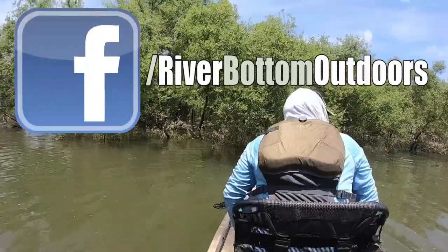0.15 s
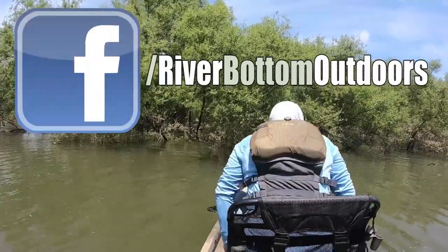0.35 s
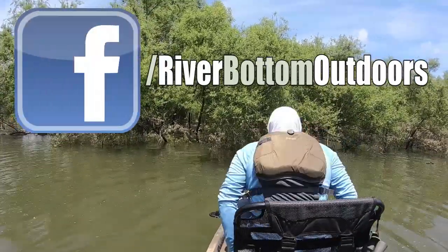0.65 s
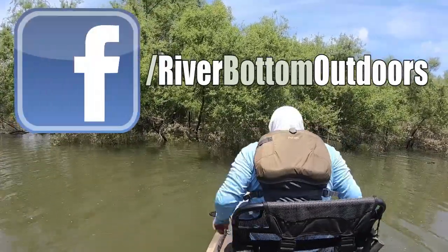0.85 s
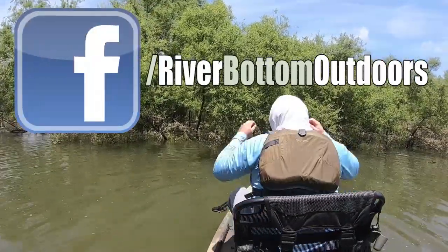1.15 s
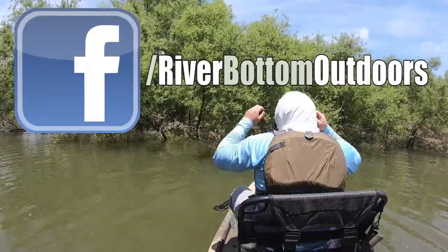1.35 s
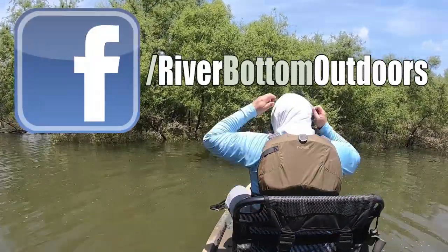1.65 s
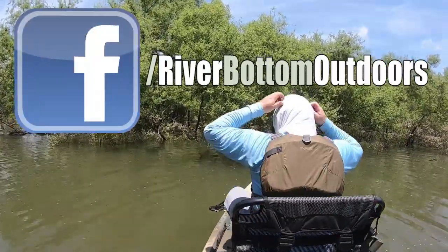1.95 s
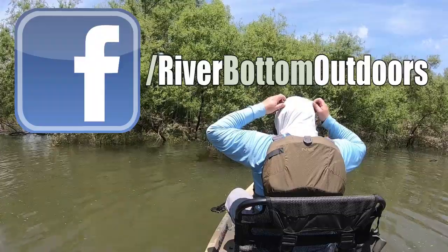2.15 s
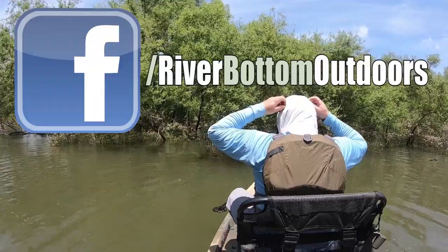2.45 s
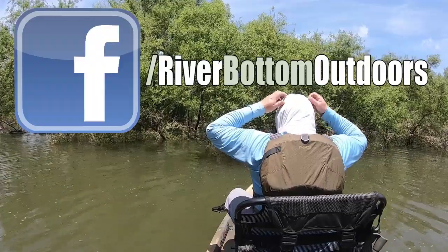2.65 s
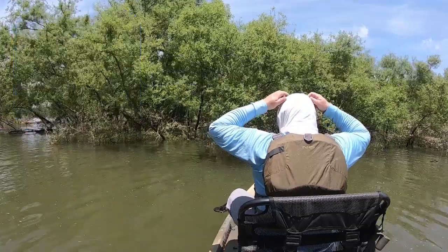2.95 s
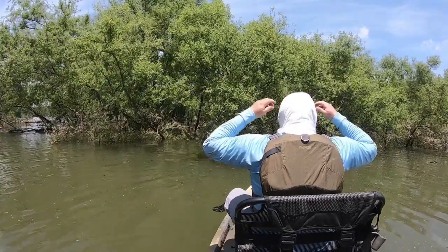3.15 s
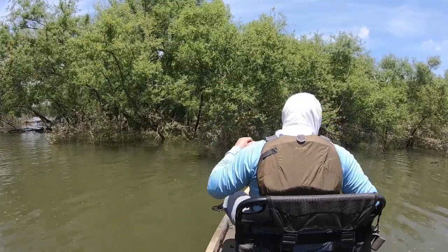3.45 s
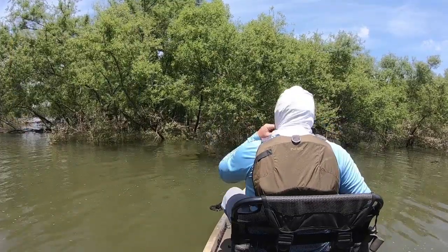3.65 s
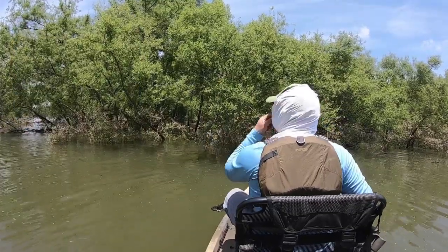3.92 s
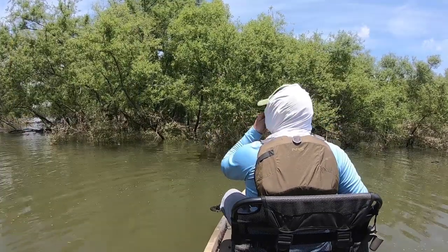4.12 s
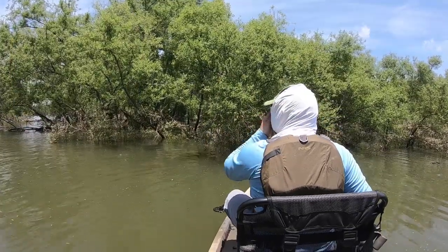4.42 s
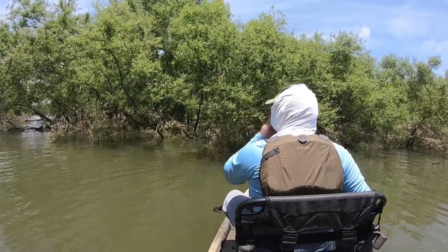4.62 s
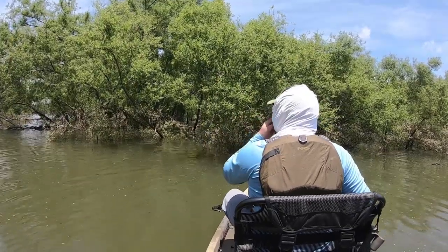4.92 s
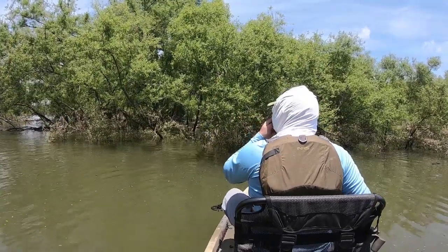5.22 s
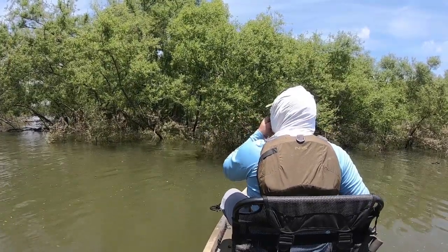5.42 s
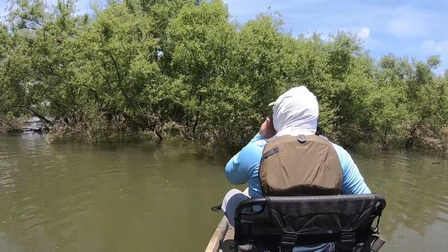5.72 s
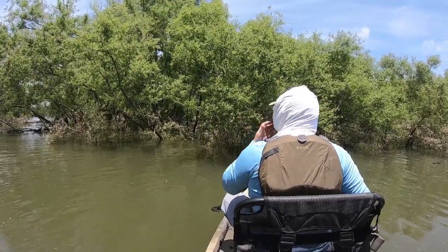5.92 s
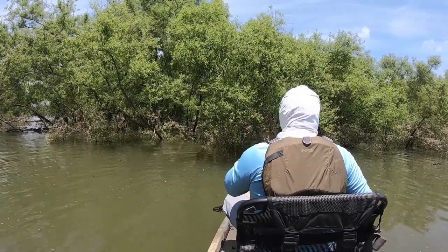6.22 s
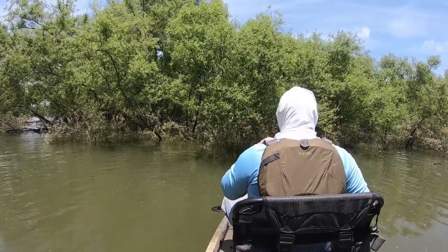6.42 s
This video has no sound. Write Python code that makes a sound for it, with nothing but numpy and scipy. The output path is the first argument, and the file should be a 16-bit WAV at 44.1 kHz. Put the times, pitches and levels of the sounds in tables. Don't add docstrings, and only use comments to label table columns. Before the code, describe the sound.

On a small drifting boat, cloth drags and the hull rumbles at once, then a pole cracks down and bounces with a hollow clatter and small gear ticks, ending in a sharp tap near one second. After that the boat calms; songbirds trill and whistle from waterside trees with soft echoes, while a distant engine idles and another revs up to a steady drone. The microphone is on the boat.

```python
import sys
import numpy as np
from scipy import signal
from scipy.fft import rfft, irfft
from scipy.io import wavfile
from scipy.ndimage import uniform_filter1d, map_coordinates

SR = 44100
rng = np.random.default_rng(int(sys.argv[2]) if len(sys.argv) > 2 else 0)


def gain_from_db(level_db):
    decades = np.asarray(level_db, float) / 20
    return 10 ** decades


def file_out(sig):
    cols = np.atleast_2d(sig).T
    lim = np.clip(cols, -1, 1)
    pcm = np.round(lim * 32767).astype(np.int16)
    wavfile.write(sys.argv[1], SR, pcm)


N = 290001
TIME = np.arange(N) / SR
STRIKE_TIME = np.arange(SR // 3) / SR
STRIKE_HZ = np.fft.rfftfreq(len(STRIKE_TIME), 1 / SR)


def unit(x):
    return x / np.sqrt(np.mean(x ** 2, axis=-1, keepdims=True) + 1e-20)


def along(points, hz):
    f, v = np.transpose(points)
    return np.interp(np.log(hz + 1), np.log(f + 1), v)


def curves(rows):
    s, *cols = np.transpose(rows)
    return [np.interp(TIME, s, c) for c in cols]


def wobble(rate):
    coarse = np.arange(0, N + 16, 16)
    knots = rng.standard_normal(int(N * rate / SR) + 4)
    return np.interp(np.arange(N), coarse, map_coordinates(knots, [coarse * rate / SR]))


def sides(pan_db):
    return gain_from_db([[pan_db / 2], [-pan_db / 2]])


def rush(spectrum, alike, patchy_db):
    _, _, z = signal.stft(rng.standard_normal((2, N + 512)), SR, nperseg=512)
    field = uniform_filter1d(rng.standard_normal(z.shape[1:]), size=6, axis=0)
    field = uniform_filter1d(field, size=10, axis=1)
    pair = signal.istft(z * gain_from_db(patchy_db * field / field.std()), SR, nperseg=512)[1][:, :N]
    size = N + 303
    hz = np.fft.rfftfreq(size, 1 / SR)
    turn = np.arccos(np.clip(along(alike, hz), -1, 1)) / 2
    shaped = rfft(pair, size) * gain_from_db(along(spectrum, hz)) * [np.cos(turn), np.sin(turn)]
    mid, side = irfft(shaped, size)[:, :N]
    return unit(np.array([mid + side, mid - side]))


def add(out, s, sound):
    part = out[:, round(s * SR):][:, :sound.shape[1]]
    part += sound[:, :part.shape[1]]


def echo(x, decay, delay, size):
    hz, t, z = signal.stft(rng.standard_normal((2, size)), SR, nperseg=256)
    tail = signal.istft(z * gain_from_db(-60 * t / along(decay, hz)[:, None]), SR, nperseg=256)[1]
    tail = np.pad(tail / np.linalg.norm(tail[0]), ((0, 0), (round(delay * SR), 0)))
    return signal.fftconvolve(x, tail, axes=1)


# (frequency [Hz], likeness [0-1])
FAR_LIKENESS = [(60, 0.87), (120, 0.95), (260, 0.73), (530, 0.42), (1100, 0.055), (2290, 0.45), (4740, 0.4),
                (9820, 0.031)]
# (frequency [Hz], level [dB per Hz])
HISS_SPECTRUM = [(880, -30), (1500, -15.5), (1790, -3.5), (2090, -2), (2660, 0), (2970, -2.5), (3330, -1),
                 (4980, -9.5), (6920, -10), (10300, -20.5), (13400, -71.5), (22000, -120)]
# (frequency [Hz], level [dB per Hz])
LEAF_SPECTRUM = [(1500, -30), (2200, -5), (3000, 4.5), (4300, -3.5), (5200, -10), (6500, -38)]
# (time [s], level [dB], half length [s])
GUSTS = [
    (0, -67.5, 0.63),
    (0.747, -79, 0.34),
    (4.805, -74, 0.18),
    (6.06, -71.5, 0.56),
]


def air():
    hiss = rush(HISS_SPECTRUM, FAR_LIKENESS, patchy_db=.4)
    breeze = sum(gain_from_db(db) * np.exp(-((TIME - s) / half) ** 2) for s, db, half in GUSTS)
    return gain_from_db(-73.5) * hiss + gain_from_db(4.0) * breeze * rush(LEAF_SPECTRUM, FAR_LIKENESS, patchy_db=4.0)


# (time [s], level [dB])
ROAR_LEVEL = [
    (0, -58),
    (.73, -61.5),
    (1.12, -68.5),
    (2.6, -65.5),
    (6.58, -61),
]
# (frequency [Hz], level [dB per Hz])
ROAR_SPECTRUM = [(35, -44.5), (60, -11), (95, -12.5), (150, -4), (200, -11.5), (330, -16.5), (520, -23.5),
                 (670, -27), (860, -22), (1000, -29.5), (1170, -23.5), (1500, -31), (2400, -38.5),
                 (4500, -120)]


def engine_roar():
    rolling = gain_from_db(.5 * wobble(3)) * rush(ROAR_SPECTRUM, FAR_LIKENESS, patchy_db=1.3)
    return gain_from_db(curves(ROAR_LEVEL)[0] + 11.5) * rolling


# (multiple of firing rate, level [dB rms])
IDLE_TONES = [(1, -61.5), (2, -53.5), (3, -56.5), (4, -60), (5, -64), (6, -68.5), (8, -72.5)]
# (time [s], half length [s], level [dB])
IDLE_SWELL = (3.6, 1.63, 6.2)


def idling_engine():
    firing_hz = 62.88
    turn = 2 * np.pi * np.cumsum(firing_hz * (1 + .002 * wobble(3))) / SR
    s, half, top_db = IDLE_SWELL
    swell_db = top_db * np.exp(-((TIME - s) / half) ** 4)
    return sum(gain_from_db(db + swell_db * (k == 4) + 3.8 * wobble(5)) * np.sin(k * turn) for k, db in IDLE_TONES)


# (time [s], firing rate [Hz], firing level [dB rms])
LAUNCH = [(0, 102.7, -77), (1.0, 102, -61), (1.25, 104.3, -64.5), (1.6, 126.5, -49), (1.94, 138.2, -49),
          (2.45, 143.3, -50.5), (3.2, 143.5, -49), (4, 145.5, -48), (4.8, 146.9, -47.5), (5.6, 146.7, -47),
          (6.58, 148.5, -49)]
# (frequency [Hz], level [dB re firing])
EXHAUST_PIPE = [(205, 2.5), (255, -12), (286, -4.5), (293, -9), (297, -24), (308, -0.5), (380, -15.5),
                (420, -25.5)]
# (multiple of firing rate, level [dB re firing])
UNEVEN_CYLINDERS = [(1 / 3, -21), (2 / 3, -16), (4 / 3, -15), (7 / 3, -21), (4, -30), (5 / 3, -22),
                    (8 / 3, -23)]


def speeding_engine():
    firing_hz, firing_db = curves(LAUNCH)
    turn = 2 * np.pi * np.cumsum(firing_hz * (1 + .0025 * wobble(5))) / SR
    tone = 0
    for k in (1, 2, 3):
        pipe_db = along(EXHAUST_PIPE, k * firing_hz) if k > 1 else 0
        tone = tone + gain_from_db(firing_db + pipe_db + 5.5 + 0.82 * wobble(9)) * np.sin(k * turn)
    for k, db in UNEVEN_CYLINDERS:
        tone = tone + gain_from_db(firing_db + db + 4 * wobble(9.8)) * np.sin(k * turn)
    return tone


def engines():
    tones = idling_engine() + speeding_engine()
    return np.array([tones, np.roll(tones, 2)]) + engine_roar()


def strokes(rows, bend, swell_db):
    notes = []
    for s, length, start_hz, end_hz, db in rows:
        u = np.linspace(0, 1, round(length * SR))
        glide = np.expm1(-bend * u) / np.expm1(-bend)
        notes.append((s, start_hz + (end_hz - start_hz) * glide, db + swell_db * (2 * u - 1) / 2))
    return notes


def arches(rows, back, swell_db, pointed):
    notes = []
    for s, length, foot_hz, top_hz, db in rows:
        u = np.linspace(0, np.pi, round(length * SR))
        below = (1 - np.sin(u) ** pointed) * np.where(u < np.pi / 2, 1, back)
        notes.append((s, top_hz - (top_hz - foot_hz) * below, db - swell_db * (1 - np.sin(u))))
    return notes


# (time [s], peak level [dB])
REPEATS = [
    (3.05, -57),
    (3.276, -54.5),
    (3.515, -52.5),
    (3.745, -51.5),
    (3.989, -52),
    (4.204, -67.5),
]


def repeats(shape):
    when, hz, level = np.transpose(shape)
    t = np.arange(when[0], when[-1], 1 / SR)
    return [(s + when[0], np.interp(t, when, hz), db + np.interp(t, when, level)) for s, db in REPEATS]


# (time [s], length [s], from [Hz], to [Hz], peak level [dB] at its best pitch)
FALLS = [(2.138, 0.1, 3970, 2667, -63.5), (2.662, .113, 5200, 2745, -64.5)]
SWOOPS = [(2.092, 0.035, 3950, 3090, -68), (2.588, 0.022, 4480, 3300, -61.5),
          (3.683, .03, 5600, 4050, -56.5), (3.892, 0.0236, 3250, 2810, -57.5),
          (5.892, .03, 3080, 2716, -60)]
DIVES = [(2.228, 0.041, 2855, 2180, -62), (3.71, .055, 4040, 2900, -57.5), (2.335, .014, 3150, 2500, -62.5),
         (2.772, 0.014, 2850, 2470, -59), (2.842, 0.02, 3750, 3000, -57.5), (2.864, .02, 2870, 2050, -60.5),
         (2.865, 0.043, 3610, 2310, -67), (4.86, 0.036, 3230, 2155, -57), (4.945, 0.021, 2740, 2100, -59),
         (4.838, 0.016, 3430, 3300, -71), (5.662, 0.032, 3150, 2190, -59), (5.872, 0.027, 3380, 3200, -66),
         (5.953, 0.032, 3133, 2550, -62)]
RISES = [(2.2, 0.023, 2320, 2910, -64), (2.296, 0.022, 2116, 3180, -58.5), (2.577, 0.012, 3300, 4500, -62),
         (2.605, 0.018, 3250, 3660, -59), (2.622, 0.03, 3600, 5370, -57.5), (2.645, .01, 5150, 5370, -57),
         (2.797, .042, 2430, 3800, -57), (3.667, 0.016, 3700, 5670, -57), (3.915, 0.075, 2760, 3120, -57),
         (4.565, 0.038, 3180, 3920, -61.5), (4.638, 0.019, 3750, 4580, -56),
         (4.695, 0.016, 4700, 5080, -62), (4.81, 0.024, 2610, 3120, -57.5), (4.83, .01, 3150, 3450, -63),
         (4.898, 0.015, 2170, 2700, -61), (4.955, .02, 2934, 3740, -64), (5.778, 0.013, 2236, 2450, -63),
         (5.81, .016, 2620, 2900, -61.5), (5.845, 0.024, 2940, 3400, -64), (3.785, .012, 3900, 4660, -63),
         (5.925, .03, 2730, 3140, -58.5)]
HOLDS = [(2.72, 0.05, 2760, 2740, -65.5), (2.27, 0.02, 2170, 2130, -66), (2.318, 0.016, 3200, 3150, -63.5),
         (3.64, 0.028, 3750, 3700, -64), (4.605, 0.035, 3900, 3870, -63), (4.657, .033, 4710, 4630, -62),
         (4.79, .018, 2500, 2490, -69), (4.91, 0.032, 2807, 2930, -56.5)]


def main_song():
    song = strokes(FALLS, bend=8.5, swell_db=-17.5)
    song += strokes(SWOOPS, bend=1.5, swell_db=-2.0)
    song += strokes(DIVES, bend=-1.2, swell_db=3.5)
    song += strokes(RISES, bend=0.45, swell_db=3)
    song += strokes(HOLDS, bend=-0.23, swell_db=-6.0)
    best_hz, above_db, below_db = 3300, 18, 5.5
    notes = []
    for s, hz, db in song:
        octave = np.log2(hz / best_hz)
        notes.append((s, hz, db - np.where(octave > 0, above_db, -below_db) * octave))
    return notes


# (time [s], length [s], from [Hz], to [Hz], peak level [dB])
PIPER = [(0, 0.039, 2794, 2697, -51), (1.197, 0.072, 4040, 4050, -67.5), (4.35, 0.085, 2790, 2800, -72.5),
         (4.118, .05, 2810, 2720, -64), (4.29, .05, 2770, 2710, -71), (4.52, 0.055, 2790, 2780, -75),
         (5.14, .02, 2480, 2520, -66), (1.135, .025, 2680, 2600, -72.5), (4.425, .067, 2800, 3300, -64.5),
         (4.67, 0.082, 3300, 2850, -63.5), (5.012, 0.065, 2877, 2700, -64.5),
         (5.648, 0.15, 3200, 3180, -67.5)]
CHIPS = [
    (6.133, 0.0306, 3760, 3420, -56),
    (6.243, 0.0324, 3920, 3420, -58),
]
VEILED = [
    (1.472, 0.023, 5500, 5000, -84.5),
    (1.49, 0.084, 4810, 3090, -73.5),
    (1.6, .035, 4400, 5240, -79.5),
]
LISPS = [(2.885, .075, 7000, 6840, -80.5), (3.36, 0.033, 6980, 7000, -76), (3.71, 0.027, 6920, 7100, -72),
         (4.225, 0.014, 7230, 7010, -70.5), (5.14, .06, 7300, 7054, -80)]
DISTANT = [(1.075, .03, 4300, 3400, -81.5), (1.3, 0.11, 3200, 2400, -81), (1.197, 0.065, 3900, 3900, -79),
           (3.76, .125, 3800, 3590, -70.5), (3.775, .1, 3400, 3700, -76), (5.597, 0.08, 3400, 3620, -78),
           (5.75, .2, 3400, 4000, -87), (5.51, .03, 5000, 4300, -83), (3.79, .05, 4650, 4600, -85),
           (5.53, 0.11, 3900, 4200, -84), (.05, .08, 2760, 2740, -69.5), (6.1, .14, 2750, 2750, -80),
           (3.93, 0.035, 3400, 3250, -74), (6, .12, 4200, 3700, -87)]
# (time [s], length [s], foot [Hz], top [Hz], peak level [dB])
HOOPS = [(5.28, 0.033, 2900, 3700, -57.5), (5.412, .03, 3100, 3670, -57.5),
         (5.302, .024, 3200, 3700, -67.5), (5.433, .024, 3200, 3720, -64.5)]
COOS = [(2.595, 0.155, 450, 650, -51), (5.655, 0.125, 300, 430, -49), (5.27, .11, 280, 375, -57.5)]
# (time from call start [s], pitch [Hz], level [dB])
WHISTLE = [(0, 2720, -12), (0.014, 2783, -3), (.068, 2790, -3), (.08, 2700, -3.5), (.095, 2424, -20)]
SLUR = [(.085, 2511, -22), (.102, 2342, -17.5), (.122, 2623, -12.5), (0.153, 2670, -14)]
# (delay [s], level [dB])
TRUNK_SLAPS = [
    (.092, -8.5),
    (.168, -13),
]


def flock():
    whistle = repeats(WHISTLE)
    slaps = [(s + late, hz, db + loss_db) for late, loss_db in TRUNK_SLAPS for s, hz, db in whistle]
    return [
        (6.5, -2, .3, main_song()),
        (0.5, -12.5, 0.11, strokes(PIPER, bend=-2.4, swell_db=-7.0)),
        (0.0, -16.0, .02, strokes(CHIPS, bend=1.3, swell_db=6)),
        (1.5, 7.5, 1.3, strokes(VEILED, bend=-3.1, swell_db=11.5)),
        (-4.0, -4.5, 0.75, strokes(LISPS, bend=.3, swell_db=-1.5)),
        (7.0, 5.5, 1.3, strokes(DISTANT, bend=0.26, swell_db=-5.5)),
        (-1.2, -11, .25, arches(HOOPS, back=1.15, swell_db=0.5, pointed=1.05)),
        (3.5, -19.5, .02, arches(COOS, back=0.42, swell_db=13.5, pointed=2.54)),
        (10, -8.5, 0.094, whistle),
        (9.5, 1.5, 0.87, repeats(SLUR)),
        (5, -5.5, 0.55, slaps)]


def sing(notes, far, waver):
    voice, spans = np.zeros((1, N)), []
    for s, hz, db in sorted(notes, key=lambda note: note[0]):
        hz, db = np.pad([hz, db], ((0, 0), (0, 200)), "edge")
        t = np.arange(len(hz)) / SR
        at = slice(round(s * SR), round(s * SR) + len(hz))
        pitch = uniform_filter1d(hz, size=170, mode="nearest")
        pitch *= 1 + .009 * far * waver[at]
        edges = np.clip(np.minimum(t / .004, (t[-1] - t) / .009), 0, 1)
        add(voice, s, edges * gain_from_db(db) * np.sin(2 * np.pi * np.cumsum(pitch) / SR)[None])
        if spans and at.start < spans[-1].stop + .03 * SR:
            last = spans.pop()
            at = slice(last.start, max(at.stop, last.stop))
        spans.append(at)
    return voice, spans


# (frequency [Hz], t60 [s])
TREE_DECAY = [(400, 0.11), (3000, 1), (8000, 0.43)]


def birds():
    out = np.zeros((2, N))
    flutter, waver, sway = wobble(110), wobble(160), unit(wobble(450))
    for pan_db, wet_db, far, notes in flock():
        voice, spans = sing(notes, far, waver)
        for at in spans:
            s, note = at.start / SR, voice[:, at]
            smeared = note * (.6 + .6 * sway[at])
            branches = echo(note, [(3000, 0.26)], delay=0.001984, size=3000)
            tree_line = echo(smeared, TREE_DECAY, delay=0.0069, size=20000)
            far_bank = echo(note, [(3000, 0.28)], delay=.12, size=6000)
            add(out, s, note * gain_from_db(4.5 * far * flutter[at]) * sides(pan_db))
            add(out, s, gain_from_db(wet_db - 0.5) * branches * sides(pan_db))
            add(out, s, gain_from_db(wet_db + 3.5) * tree_line)
            add(out, s, gain_from_db(wet_db - 7.0) * far_bank)
    return out


# (time [s], peak level [dB], settling [dB/s])
LURCHES = [(0.04, -40.5, 127), (0.165, -38, 154), (0.215, -35, 130), (.285, -42, 205), (.375, -40, 146),
           (.5, -43, 99), (.595, -35, 113), (.695, -41.5, 89), (.8, -45.5, 63), (.885, -47, 403),
           (1.085, -44.5, 111), (1.24, -54.5, 97), (2, -51, 70), (2.3, -54, 99), (3.42, -56, 87),
           (3.62, -53, 257), (5.15, -56.5, 30.5), (5.75, -64.5, 42)]
# (frequency [Hz], level [dB per Hz])
HULL_SPECTRUM = [(12, -27.5), (20, -7.5), (49, 4), (81, -5.5), (119, 3), (150, -14.5), (206, -9),
                 (400, -25), (520, -51), (880, -120)]


def rocking_hull():
    sway = gain_from_db(-69)
    for s, db, fall in LURCHES:
        slope = np.where(TIME < s, -350.5, fall)
        sway = sway + gain_from_db(db - slope * (TIME - s))
    rumble = rush(HULL_SPECTRUM, [(30, 0.28), (80, 0.82), (200, 1.0)], patchy_db=0.5)
    return sway * gain_from_db(1.8 * wobble(5.8)) * sides(-1.9) * rumble


# (time [s], level [dB])
CLOTH_DRAG = [
    (0.0, -83),
    (0.14, -69.5),
    (.21, -71.5),
    (0.3, -65.5),
    (0.44, -66),
    (.5, -75),
    (0.7, -76.5),
    (1.0, -93),
]
# (frequency [Hz], level [dB per Hz])
CLOTH_SPECTRUM = [(250, -31.5), (400, -11.5), (700, -17), (1340, -7), (2430, -3), (4800, -17.5),
                  (7120, -12.5), (9500, -25), (10600, -32), (12000, -49), (16500, -89)]
# (frequency [Hz], level [dB per Hz])
FIZZ_SPECTRUM = [(9000, -30), (10500, -2), (13000, 0.5), (14200, -9), (15500, -30)]
# (time [s], half length [s], level [dB])
FIZZ_MOMENT = (.335, .125, -80)


def rustling_cloth():
    grain = gain_from_db(1.2 * wobble(66) + 1.6 * wobble(500))
    drag_db = curves(CLOTH_DRAG)[0] - 40 * (np.arange(N) > 1.3 * SR)
    rub = rush(CLOTH_SPECTRUM, [(500, 0.87), (1100, .2), (3000, 0.69), (9000, 0)], patchy_db=1.9)
    s, half, top_db = FIZZ_MOMENT
    fizz = gain_from_db(top_db) * np.exp(-((TIME - s) / half) ** 4)
    fizz = fizz * grain * rush(FIZZ_SPECTRUM, [(9000, .1)], patchy_db=6.0)
    return fizz + gain_from_db(drag_db + 11.0) * sides(-8.5) * unit(grain * rub)


def ring(modes, attack):
    t = STRIKE_TIME
    rise = 1 - np.exp(-t / attack)
    return rise * sum(gain_from_db(db - 60 * t / t60) * np.sin(2 * np.pi * hz * t) for hz, db, t60 in modes)


def band(low_hz, high_hz):
    f = STRIKE_HZ
    return 1j * f / (low_hz + 1j * f) / (1 + 1j * f / high_hz) ** 3


def burst(t60, colour):
    size = len(STRIKE_TIME)
    noise = gain_from_db(-60 * STRIKE_TIME / t60) * rng.standard_normal((2, size))
    return irfft(rfft(noise) * colour, size)


# (frequency [Hz], level [dB], t60 [s])
HULL_BOOM = [(251, 5.5, 0.063), (205, -3, 0.083), (121.7, -7.5, 0.19), (65, -24, 0.078), (476, -11.5, 0.06),
             (616, -10, 0.055), (855, -10.5, 0.043)]
# (frequency [Hz], level [dB], t60 [s])
POLE_RING = [(686, -14.5, 0.033), (1122, -19.5, 0.061), (1470, -6.5, 0.083), (1398, -15.5, 0.036),
             (1626, -22, 0.06), (2050, -10.5, 0.031), (2400, 0, 0.032), (2800, -33, 0.048),
             (3406, -19, 0.034), (4020, -8, 0.036), (5040, -23, 0.077), (6620, -18, 0.024),
             (6930, -13, 0.027)]
# (time [s], crack level [dB], left-right [dB])
KNOCK = [
    (0.567, -11, -10.5),
    (0.5697, -11, -7),
]


def pole_knock(out):
    swell = np.clip(STRIKE_TIME / .0015, 0, 1)
    for s, db, pan_db in KNOCK:
        add(out, s, gain_from_db(db + 7.5) * swell * burst(0.02, band(810, 4000)) * sides(pan_db))
    tip_s, shaft_s = KNOCK[0][0], KNOCK[1][0]
    add(out, tip_s, gain_from_db(-14.5) * ring(POLE_RING, attack=0.0022) * sides(-13))
    add(out, shaft_s, gain_from_db(-15) * sides(-1.8) * ring(HULL_BOOM, attack=0.0041))


# (frequency [Hz], width [Hz], level [dB])
DECK_MODES = [(439, 18.4, 4), (750, 280, -5), (1280, 710, -5), (1790, 310, -2.5), (2070, 72, -3.5),
              (2850, 290, -8.5), (3500, 400, -15), (4400, 350, -15), (7000, 4900, -27)]
# (time [s], peak level [dB], skid t60 [s], softness cut [Hz], hull level [dB])
BOUNCES = [(0.1817, -44, 0.044, 4000, 2), (.612, -52, .03, 1000, 19.5), (0.699, -25, 0.033, 6640, -26),
           (.705, -33, 0.06, 3500, -25), (0.765, -32, 0.037, 6460, -11.5), (.788, -45, 0.03, 6000, -29),
           (0.804, -31.5, 0.065, 2570, -13), (.826, -41, 0.044, 2500, -13), (0.843, -42, 0.11, 2500, -4),
           (0.871, -43.5, 0.06, 1210, -8), (1.07, -48.5, 0.087, 700, 6), (2.07, -54, .04, 1498, 7.5),
           (2.156, -53, 0.058, 1490, -7), (2.822, -57, .04, 1500, -8)]


def deck_bounces(out):
    f, deck = STRIKE_HZ, 0
    for k, (hz, width, db) in enumerate(DECK_MODES):
        deck = deck + (-1) ** k * gain_from_db(db) * 1j * f * width / (hz * hz - f * f + 1j * f * width)
    for s, db, t60, cut_hz, hull_db in BOUNCES:
        skid = burst(t60, deck * band(200, cut_hz))
        skid = skid / abs(skid).max() * sides(-11)
        add(out, s, gain_from_db(db) * (skid + gain_from_db(hull_db) * ring(HULL_BOOM, attack=0.0012)))


# (time [s], peak level [dB], own ring [Hz], ring t60 [s],
# left-right [dB])
GEAR_TICKS = [(.7, -33, 1894, 0.038, -18), (.701, -38, 2820, 0.039, -15), (.702, -43, 4330, 0.031, -11),
              (.703, -45, 442, 0.099, -3), (0.767, -37.5, 1790, 0.049, -16), (.767, -51, 2970, .08, -12),
              (.766, -58, 7000, 0.022, -4), (1.07, -43, 830, .05, -7), (.145, -52, 7500, .015, -5),
              (.4915, -46, 3500, 0.018, -16), (0.4906, -42, 1470, 0.019, -14),
              (0.4936, -52.5, 9300, .015, -8), (.825, -62, 6800, .01, -5), (.87, -59, 8950, .01, -5),
              (0.492, -38, 6730, 0.021, -19), (.528, -43.5, 2020, 0.045, -18),
              (.818, -49.5, 1623, 0.21, -19), (.864, -56, 5200, 0.0092, 0), (.897, -58, 8700, 0.013, -17),
              (.9233, -50, 2020, 0.047, -16), (0.973, -19.5, 1432, 0.024, -16),
              (0.9733, -42.5, 6600, 0.018, -11.5), (.990, -49, 7000, 0.014, -10),
              (0.99, -50, 9500, .015, -11), (0.9728, -41, 9500, 0.01, -8), (1.198, -62, 5440, 0.014, 5),
              (1.36, -61, 7000, 0.013, -5), (1.495, -59, 7800, 0.014, -4), (3.087, -56, 5760, 0.016, -8),
              (5.92, -55, 8600, 0.017, -4)]


def gear_ticks(out):
    for s, db, hz, t60, pan_db in GEAR_TICKS:
        tick = ring([(hz, 0, t60), (1.4 * hz, -12, 0.38 * t60)], attack=0.001)
        tick = tick * [[-1], [1]]
        click_db = 2.5 + 5 * np.log2(hz / 7000)
        click = gain_from_db(click_db) * burst(0.012, band(0.9 * hz, 2.0 * hz))
        add(out, s, gain_from_db(db) * sides(pan_db) * (tick + click))


def knocks():
    out = np.zeros((2, N))
    pole_knock(out)
    deck_bounces(out)
    gear_ticks(out)
    cockpit = echo(out.mean(0)[None], [(300, 0.33), (3000, 0.018), (9000, 0.04)], delay=0.0046, size=12000)
    add(out, 0, gain_from_db(-27.5) * cockpit)
    return signal.sosfilt(signal.butter(5, 9000, fs=SR, output="sos"), out)


def scene():
    return air() + engines() + birds() + rocking_hull() + rustling_cloth() + knocks()


def low_pass(x):
    return signal.sosfilt(signal.butter(12, 14800, fs=SR, output="sos"), x)


def record(dry):
    return low_pass(dry)


dry = scene()
out = record(dry)
file_out(out)
```